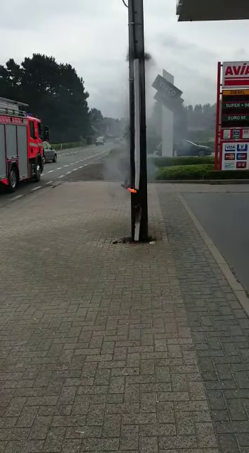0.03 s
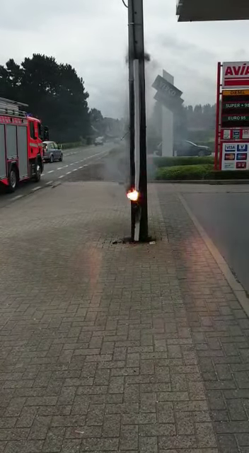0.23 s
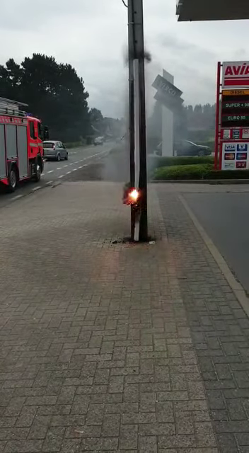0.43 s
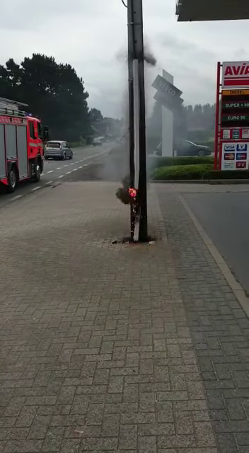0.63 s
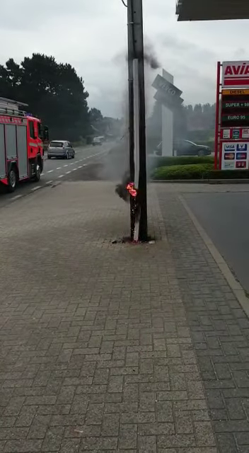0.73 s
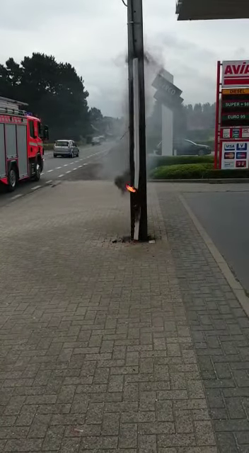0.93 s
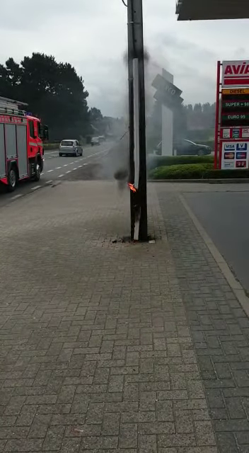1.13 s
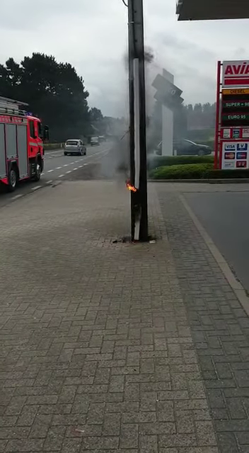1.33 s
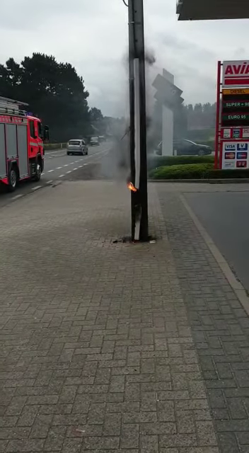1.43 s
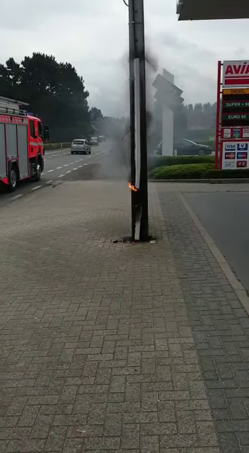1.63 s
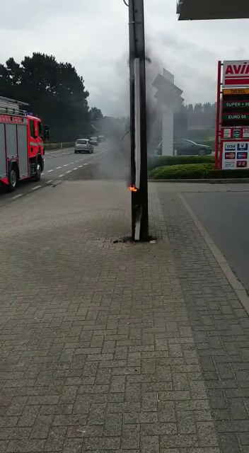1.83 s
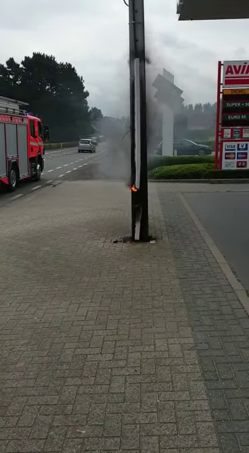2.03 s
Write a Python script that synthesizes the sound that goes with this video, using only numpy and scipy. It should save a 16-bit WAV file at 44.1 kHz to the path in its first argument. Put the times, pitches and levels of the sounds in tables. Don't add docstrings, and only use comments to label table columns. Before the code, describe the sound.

Harsh buzzing crackle of an electrical arc, stuttering then stopping, echoing along a street over engine rumble

```python
import sys
import numpy as np
from scipy import signal
from scipy.fft import rfft, irfft, next_fast_len
from scipy.io import wavfile
from scipy.ndimage import uniform_filter1d

SR = 44100
rng = np.random.default_rng(int(sys.argv[2]) if len(sys.argv) > 2 else 0)


def store_wav(level_fs):
    pcm = np.round(np.clip(np.atleast_2d(level_fs), -1, 1) * 32767)
    wavfile.write(sys.argv[1], SR, pcm.T.astype(np.int16))


def attenuation_scalar(level_db):
    decades = np.asarray(level_db, float) / 20
    return 10 ** decades


N = 92610


def evened(x):
    return x / np.sqrt(np.mean(x ** 2) + 1e-20)


def read(points, hz):
    f, value = np.transpose(points)
    return np.interp(np.log(hz + 1), np.log(f + 1), value)


def slow(rate_hz, count):
    t = np.arange(N) / SR
    f = np.geomspace(rate_hz / 20, rate_hz, 12)[:, None]
    turn = rng.random((count, 12, 1))
    waves = np.sin(2 * np.pi * (f * t + turn)) / np.sqrt(f)
    return evened(np.sum(waves, axis=1))


def causal(points):
    log_gain = np.log(attenuation_scalar(read(points, abs(np.fft.fftfreq(2048, 1 / SR)))))
    spectrum = np.exp(log_gain - 1j * signal.hilbert(log_gain).imag)
    taps = np.fft.ifft(spectrum).real[:1024]
    return taps / np.linalg.norm(taps)


def diffuse(gain):
    # pitch_hz, likeness (0 to 1)
    likeness = [(60, 0.91), (200, 0.98), (640, 0.75), (1400, 0.75), (3000, .3), (7000, 0.14), (15000, .1)]
    hz = np.fft.rfftfreq(512, 1 / SR)[:, None]
    t = np.arange(N // 128 + 5) * 128 / SR
    a, b, c, d = rng.standard_normal((len(t), 257, 4)).T
    same = np.clip(read(likeness, hz), 0, 1)
    left = a + 1j * b
    right = same * left + np.sqrt(1 - same ** 2) * (c + 1j * d)
    spectra = np.array([left, right]) * gain(hz, t)
    return evened(signal.istft(spectra, nperseg=512, noverlap=384)[1][:, :N])


def ports(x, tilt, lead_s):
    # pitch_hz, left_minus_right_db
    left_gain = [(60, 2), (150, 0), (380, 0.5), (950, 0.0), (2380, -1.5), (5980, 17.5), (15000, 18)]
    size = next_fast_len(N + 4096)
    hz = np.fft.rfftfreq(size, 1 / SR)
    half = attenuation_scalar(tilt * read(left_gain, hz) / 2) * np.exp(1j * np.pi * hz * lead_s)
    padded = np.pad(x, [(0, 0), (0, size - N)], "reflect")
    return irfft(rfft(padded) * np.array([half, 1 / half]), size)[:, :N]


def road():
    # pitch_hz, level_db (per Hz)
    rumble_colour = [(25, -33), (60, 0), (200, -4.5), (600, -9.5), (1100, -12.5), (2000, -24), (3300, -36),
                     (9000, -72)]
    # start_s, level_db
    traffic = [
        (0, -2.5),
        (.7, 3),
        (1.1, -3.5),
        (1.4, -2.5),
        (1.7, -0.5),
        (1.9, 0),
        (2.1, -1),
    ]
    # pitch_hz, level_db (per Hz)
    hiss_colour = [(1500, -7), (3500, -10), (6000, -5.5), (8300, -9.5), (10800, -7), (12200, -17),
                   (15500, -13), (15900, -40)]
    # start_s, level_db
    hiss_level = [(0, -76), (1.3, -77.5), (1.75, -76), (2.1, -75)]
    rumble_db, gust_db = -46, 0.6
    t = np.arange(N) / SR

    grid = rng.standard_normal((N // 128 + 5, 257))
    patches = evened(uniform_filter1d(uniform_filter1d(grid, 20, 0), 6, 1)).T
    rumble = diffuse(lambda hz, _: attenuation_scalar(read(rumble_colour, hz) + 1.3 * patches))
    traffic_db = np.interp(t, *np.transpose(traffic))
    rumble = rumble * attenuation_scalar(rumble_db + traffic_db + gust_db * slow(11, count=1))
    hiss = diffuse(lambda hz, _: attenuation_scalar(read(hiss_colour, hz) + 1.4 * patches))
    return rumble + hiss * attenuation_scalar(np.interp(t, *np.transpose(hiss_level)))


def truck():
    # multiple (of the firing rate), level_db
    idle = [(1, 4.5), (2, -1.5), (3, -8.5), (4, -13.5), (5, -47), (6, -5.5), (7, -9), (8, -5.5), (9, -40),
            (10, -9), (11, -92), (12, -10.5), (13, -19), (14, -16), (15, -16.5), (16, -16.5)]
    # multiple (of the firing rate), level_db
    cylinders = [(2 / 3, -6), (7 / 3, -14), (11 / 3, -7.5)]
    # start_s, exhaust_boom_db, pump_drone_db
    load = [
        (0, -17, -1),
        (.2, 5, 1.5),
        (.9, -7.5, 1),
        (1.2, 3.5, -1),
        (1.549, -6, -2),
        (1.8, 1, -1),
        (1.949, -9.5, 1),
        (2.1, 6, 0.5),
    ]
    firing_hz, wander = 75.7, 0.002
    idle_db, throb_db = -49.5, 1.5

    orders = np.array(list(idle) + list(cylinders))
    multiple, tone_db = orders[:, :1], orders[:, 1:]
    turns = np.cumsum(firing_hz * (1 + wander * slow(3.02, count=1)[0])) / SR
    s, boom_db, drone_db = np.transpose(load)
    t = np.arange(N) / SR
    boom, drone = np.interp(t, s, boom_db), np.interp(t, s, drone_db)
    load_db = np.where(multiple % 2 == 0, drone, boom)
    level = attenuation_scalar(idle_db + tone_db + load_db + throb_db * slow(10, count=len(orders)))
    start = rng.random((len(orders), 1))
    return (level * np.sin(2 * np.pi * (multiple * turns + start))).sum(0)


def ring(t, hz, t60):
    return np.sin(2 * np.pi * hz * t) * attenuation_scalar(-60 * np.maximum(t, 0) / t60) * (t > 0)


def crack(t, level_db):
    pitch_hz, spread, t60 = 931, 0.21, 0.0065
    restrike_s, restrike_db, restrike_spread_db = 0.002354, -5.5, 3.5
    pitch_luck, time_luck, level_luck, again_luck = rng.uniform(-0.98, 1, 4)
    first = ring(t, pitch_hz * (1 + spread * pitch_luck), t60)
    late = t - restrike_s * (1 + 0.35 * time_luck)
    again = ring(late, pitch_hz * (0.75 + 0.39 * again_luck), t60)
    return attenuation_scalar(level_db + 1.5) * (first + attenuation_scalar(restrike_db + restrike_spread_db * level_luck) * again)


def hot_air_push(t, level_db):
    push_hz = 186.6 * (1 + 0.08 * rng.uniform(-0.98, 1))
    push = ring(t, push_hz, t60=0.026)
    swell = ring(t - 0.0041, 97, t60=0.015)
    return attenuation_scalar(level_db + 6) * (attenuation_scalar(-2) * swell - push)


def torn_edge(t, level_db):
    return attenuation_scalar(level_db - 14.5) * np.exp(-t / 0.0021) * rng.standard_normal(len(t))


def fizz(t, level_db):
    rise_s, fall_s, grain_db = 0.0005, 0.002, 5
    noise, grains = rng.standard_normal((2, len(t)))
    shape = (1 - np.exp(-t / rise_s)) * np.exp(-t / fall_s)
    return attenuation_scalar(level_db + 11.5 + grain_db * grains) * shape * noise


def arc():
    # start_s, crack_db, fizz_db, push_db
    strikes = [(0.2054, 1.5, -30.5, -9.5), (0.2177, -9.5, -54, -14), (0.2302, -13, -48, -39),
               (0.245, -0.5, -22.5, -16.5), (0.2542, -5.5, -24.5, -10.5), (0.2645, -10, -31, -14.5),
               (0.2743, 0.5, -27.5, -10.5), (0.2877, -17, -28.5, -18), (0.2956, -2, -60, -13),
               (0.3474, -3.5, -25, -22), (0.3649, 0, -26, -28), (0.3766, -23, -44, -18.5),
               (0.3845, -2, -22, -14.5), (0.3949, 0, -28, -11.5), (0.4043, -19, -22.5, -18),
               (0.4158, -15.5, -23.5, -13), (0.426, -14, -32, -17), (0.4351, -5, -35, -10),
               (0.4469, -2, -52, -14.5), (0.4555, -0.5, -32, -14), (0.4666, -11, -34.5, -21),
               (0.4772, -35, -27.5, -20.5), (0.4871, -35, -33.5, -22), (0.5152, -6.5, -26, -20),
               (0.5229, -8, -21.5, -10.5), (0.5345, -4, -25, -13.5), (0.6052, -4.5, -31.5, -23),
               (0.6232, -7, -39, -23.5), (0.7359, -3.5, -23, -23.5), (0.7464, -11.5, -37.5, -28)]
    # pitch_hz, level_db (per Hz)
    fizz_colour = [(400, -31), (1800, 2.5), (3000, -0.5), (5000, -6.5), (8300, -24), (11500, -7.5),
                   (15300, -16), (16800, -47)]
    # pitch_hz, level_db (per Hz)
    edge_colour = [(800, -25.5), (2200, 1.5), (3500, -1.5), (5200, -7.5), (7500, -24.5)]
    low_cut_hz, blunt_hz = 124, 3040

    t = np.arange(2000) / SR
    body, spit, edge = np.zeros((3, N))
    for start_s, crack_db, fizz_db, push_db in strikes:
        first = round(start_s * SR)
        at = slice(first, first + len(t))
        body[at] += crack(t, crack_db) + hot_air_push(t, push_db)
        edge[at] += torn_edge(t, crack_db)
        spit[at] += fizz(t, fizz_db)
    band = signal.butter(2, [low_cut_hz, blunt_hz], "band", fs=SR, output="sos")
    body = signal.sosfilt(band, body)
    spit = signal.oaconvolve(spit, causal(fizz_colour))[:N]
    edge = signal.oaconvolve(edge, causal(edge_colour))[:N]
    return body + spit + edge


def early_echoes(x):
    # delay_s, level_db, left_minus_right_s
    bounces = [
        (.0011, -9, .0001),
        (.0042, -15.5, -.0003),
        (.0075, -21.5, .0005),
        (.0130, -11, -.0005),
        (.0155, -26, .0004),
        (0.0245, -20, -.0006),
        (0.038, -17, .0006),
    ]
    dull_hz = 3240
    taps = np.zeros((2, round(0.06 * SR)))
    for delay_s, db, apart_s in bounces:
        taps[0, round((delay_s + apart_s / 2) * SR)] = attenuation_scalar(db)
        taps[1, round((delay_s - apart_s / 2) * SR)] = attenuation_scalar(db)
    r = np.exp(-2 * np.pi * dull_hz / SR)
    return signal.lfilter([1 - r], [1, -r], signal.oaconvolve(x[None], taps, axes=1)[:, :N])


def street_tail(x):
    # pitch_hz, t60_s (time to fall 60 dB)
    far_t60 = [(60, 0.56), (250, 1.1), (1000, 0.85), (2600, 1.19), (4000, 1.01), (6500, 0.77), (9000, 0.56),
               (16000, 0.43)]
    # pitch_hz, level_db
    tail_colour = [(60, 11.5), (200, 6), (600, 6), (1500, 6), (4000, -1), (8000, 4.5), (16000, -1.5)]
    # pitch_hz, level_db
    front_colour = [(300, -33), (500, -2.5), (1200, -1), (3500, 9.5), (6500, -5), (8500, -20), (12000, -19),
                    (16000, -32)]
    near_t60, near_db, far_db, fronts_db = 0.17, -7, -17, -19.5
    far_start_s, fronts_from_s, fronts_to_s = 0.06, 0.041, 0.108

    t = np.arange(N) / SR
    near = diffuse(lambda hz, s: attenuation_scalar(read(tail_colour, hz) - 60 * s / near_t60))
    near = near * np.minimum(t / 0.0071, 1)
    far = diffuse(lambda hz, s: attenuation_scalar(read(tail_colour, hz) - 60 * s / read(far_t60, hz)))
    far = far * (1 - np.exp(-t / far_start_s))
    row = np.clip(t / fronts_from_s, 0, 1) * np.clip((fronts_to_s - t) / 0.0059, 0, 1)
    fronts = evened(row * diffuse(lambda hz, s: attenuation_scalar(read(front_colour, hz) + 0 * s)))
    tail = (attenuation_scalar(near_db) * near + attenuation_scalar(far_db) * far + attenuation_scalar(fronts_db) * fronts) / np.sqrt(N)
    return signal.fftconvolve(x[None], tail, axes=1)[:, :N]


def street(x):
    lead_s = 0.00011
    direct = ports(x + early_echoes(x), tilt=0.7, lead_s=lead_s)
    return direct + ports(street_tail(x), tilt=0.18, lead_s=lead_s)


def scene():
    background = ports(road() + truck(), tilt=0.9, lead_s=0.00012)
    return background + street(arc())


def band_limit(x):
    return signal.sosfilt(signal.butter(12, 16980, fs=SR, output="sos"), x)


def record(dry):
    soft = np.tanh(dry)
    treble_cut = signal.firwin(511, 16200, window=("kaiser", 9), fs=SR)
    mix = signal.oaconvolve(soft, treble_cut[None], "same")
    return band_limit(mix)


dry = scene()
out = record(dry)
store_wav(out)
```